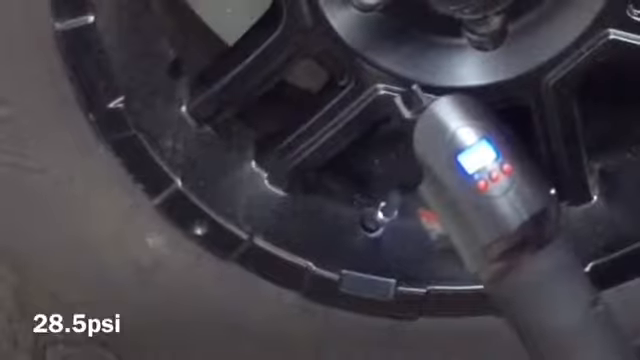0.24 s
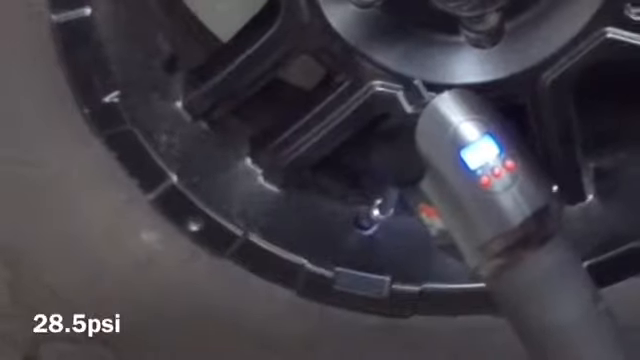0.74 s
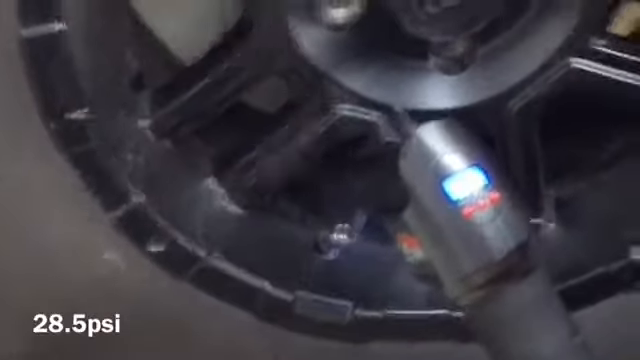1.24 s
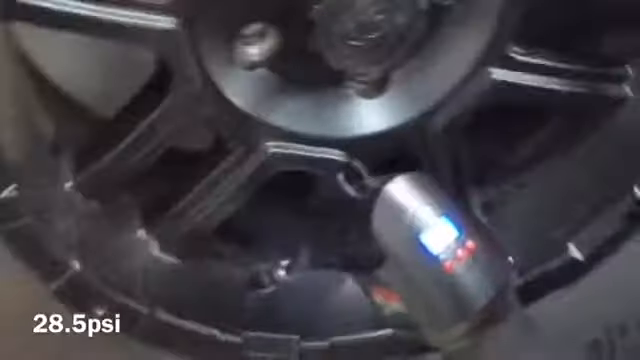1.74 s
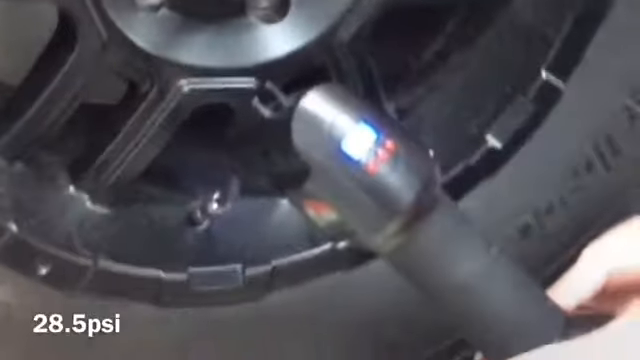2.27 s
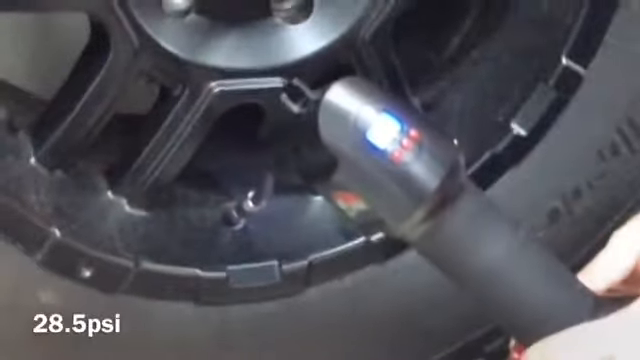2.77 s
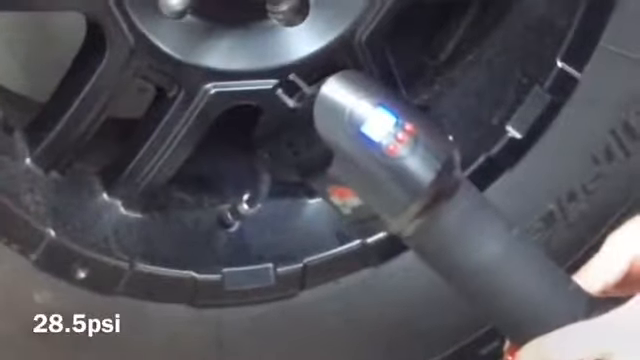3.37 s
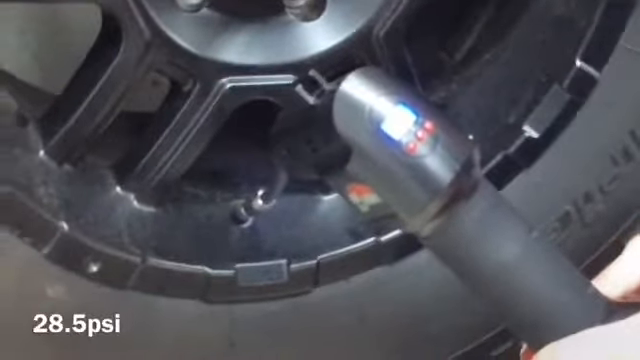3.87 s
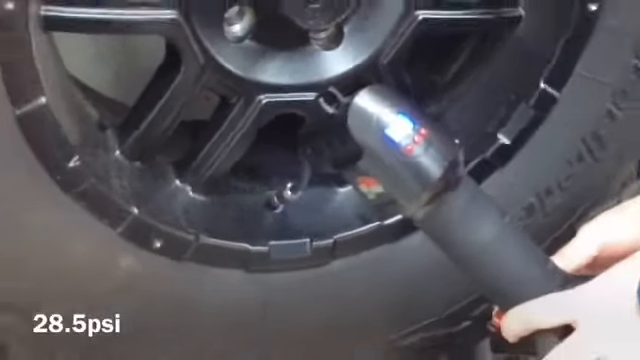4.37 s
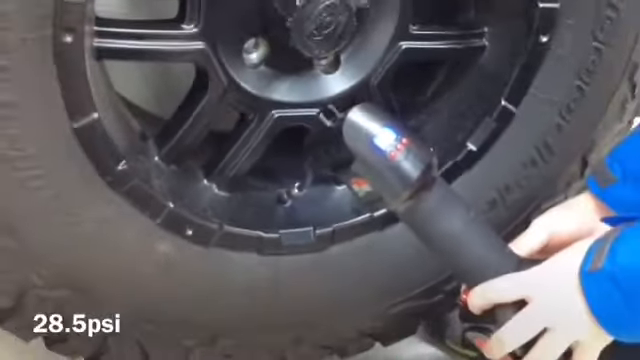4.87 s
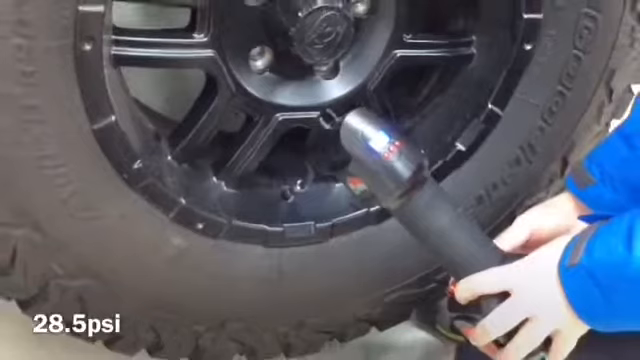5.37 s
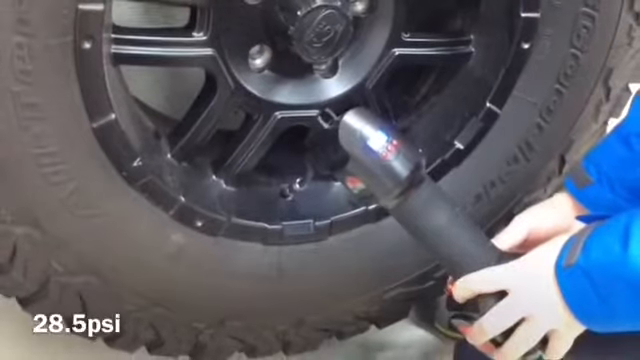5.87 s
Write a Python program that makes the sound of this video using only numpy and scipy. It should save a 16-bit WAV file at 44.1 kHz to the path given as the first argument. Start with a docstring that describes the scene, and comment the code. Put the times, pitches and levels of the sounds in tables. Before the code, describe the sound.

From 0 to about 6 seconds a small cordless compressor runs without a break, close to the microphone beside a car wheel. Roughly 41 to 42 piston strokes each second merge into a rough, steady, buzzing drone. Each stroke carries sharp valve slaps and reed flutter ringing around 1 kilohertz and 2 kilohertz, thin housing vibration, dense gear-tooth rattle and air hiss that surges and dips with the stroke. Pitch barely sags, with tiny irregular wobble. Until 1.3 seconds the sound is frontal and bright; between about 1.35 and 1.95 the microphone moves round, and the hiss and knocks change colour. Around 2.7 to 2.9 it turns further sideways and the fine high spray drops a few decibels. Afterwards the slightly duller buzz holds even to the end, dry, with only a faint quick echo off the rim.

```python
"""A small cordless compressor pumps a car tyre at a nearly even speed, heard close up in front of the wheel.
On each crank turn the intake reed flutters and the outlet valve lifts and slaps shut: clicks made to ring.
The piston shakes the housing (a sum of cosines), the gear teeth rattle (smeared ticks) and air hisses
through the pump (coloured noise). The treble dulls a little as the microphone moves round."""
import sys
import numpy as np
from scipy import signal
from scipy.fft import rfft, irfft
from scipy.io import wavfile
from scipy.ndimage import map_coordinates

SR = 44100
rng = np.random.default_rng(int(sys.argv[2]) if len(sys.argv) > 2 else 0)


def inscribe(sig):
    """Save sig as 16-bit PCM at rate SR to the path in sys.argv[1].

    A 1-D sig is mono; a 2-D sig holds one channel per row.
    Samples are clipped to [-1, 1] before scaling.
    """
    pcm = np.round(np.clip(np.atleast_2d(sig).T, -1, 1) * 32767)
    wavfile.write(sys.argv[1], SR, pcm.astype(np.int16))


N = 269892   # length in samples

# Knocks of the valves, reed and piston in one turn. Each row: crank position in turns, ring in Hz,
# ring width in Hz, relative peak in dB, gain towards the side in dB, unevenness from turn to turn in dB.
VALVE_KNOCKS = [ (0.0287, 2167, 139, -27, 2.5, .1), (0.1599, 2052, 97, -26, -2, 0.2),
                (0.43, 859, 154, -24, 1.2, 1.1), (0.424, 1355, 106, -28, -2.5, -0.7),
                (.4265, 2537, 157, -42, 11, 1.5), (0.525, 1111, 119, -23, 0.5, 0.1),
                (0.5271, 1810, 159, -39, 7.5, 2), (0.586, 3150, 400, -30.5, -10, 3.5),
                (.644, 896, 374, -13, 1, .3), (0.728, 1085, 387, -19.5, 0.5, 0),
                (0.803, 614.7, 55.5, -46.5, 9, 1.5), (.959, 2447, 132, -38.5, 10.5, .5),
                (.010, 4590, 400, -27, -9, 1.5)]
# Housing shaken by the piston. Each row: multiple of the crank speed, relative level in dB.
HOUSING_SHAKE = [(1, -40), (2, -15.5), (3, -17.5), (4, -11.5), (5, -10.5), (6, -9), (7, -4.5), (8, -5.5),
                 (9, -31), (10, -14.5), (11, 2.5), (12, -4)]
# Colour of the hiss in front of the pump. Each row: frequency in Hz, relative level in dB per Hz.
FRONT_HISS_COLOUR = [(2100, 2), (2500, 3), (2750, 0.5), (3050, 4), (3600, 0), (4150, 0), (4650, 4.5),
                     (5000, -3), (6000, 3.5), (6600, -4), (7500, -7)]
# Colour of the hiss at the side of the pump. Each row: frequency in Hz, relative level in dB per Hz.
SIDE_HISS_COLOUR = [(2100, 2), (2600, 7.5), (2950, -2), (3300, 1), (3650, -2), (3960, 7), (4250, -1.5),
                    (4520, 3.5), (5000, -1.5), (5500, 3.5), (6150, 4), (6600, -1.5), (7500, -1)]
# Colour of the fine, high spray of air. Each row: frequency in Hz, relative level in dB per Hz.
SPRAY_COLOUR = [(5500, -32), (6800, 3), (7400, -2), (8800, 4.5), (10000, 2), (11200, -1), (12800, -0.5),
                (13700, 0.5), (14800, -4), (15800, -6)]
# Colour of turbulence and rattle in the pump body and hose. Each row: frequency in Hz,
# relative level in dB per Hz.
CHURN_COLOUR = [(42, -32), (55, -20.5), (130, -30), (230, -18), (340, -12), (460, -7.5), (540, -9.5),
                (680, -4.5), (900, 0), (1020, 2), (1230, -10.5), (1350, -2.5), (1650, -9.5), (1950, -3),
                (2500, -8)]
# Moves of the microphone round the pump. Each row: start in seconds, length in seconds,
# share of the side view gained, change of the fine spray in dB.
MICROPHONE_MOVES = [(1.35, .6, 0.55, 0.4), (2.66, 0.26, .33, -3.5)]

START_VIEW = 0.088   # 0 in front of the pump, 1 at its side
PINION_TEETH, WHEEL_TEETH = 11, 41
# The crank slows a little as the tyre fills.
START_TURN, START_TURNS_PER_S, SAG_TURNS_PER_S2 = -.237, 41.602, .0361
WOBBLE_TURNS = .0017   # size of the pinion's slowest wobble
# The crank also runs a little ahead of or behind its steady pace, whole strokes at a time.
WANDER_TURNS, WANDER_HZ = .005, 5
# Levels in front of the pump, and what they gain at its side.
OUTLET_DB, OUTLET_SIDE_DB = -28.5, -2
INTAKE_DB, INTAKE_SIDE_DB = -31, 0.36
AIR_DB, AIR_SIDE_DB = -30.5, -0.72
HOUSING_DB = -39.5
CHURN_DB = -3   # compared with the outlet
SPRAY_DB = -34.5   # before the microphone moves
AIR_FOLLOWS_SPRAY = 0.36   # share of the spray's changes in dB that the lower hiss takes on
# The hiss surges while the outlet valve is open, drops when it shuts and recovers as the piston draws air.
OPEN_TURN, SHUT_TURN, VALVE_TRAVEL_TURNS = .46, 0.61, 0.14
LULL_DB, RECOVER_TURNS = -3, 0.4
CUTOFF_HZ = 15750


def from_db(db):
    """Decibels to gain."""
    return 10 ** (np.asarray(db) / 20)


def rms_one(x):
    """Scale to an average power of 1."""
    return x / np.sqrt(np.mean(x ** 2) + 1e-20)


def ramp(x, start, length):
    """Rise evenly from 0 to 1 over the given stretch."""
    return np.clip((x - start) / length, 0, 1)


def coloured(x, spectrum):
    """Give a sound a spectrum that falls away steeply beyond its ends; average power 1."""
    hz, db = np.transpose(spectrum)
    f = np.maximum(np.arange(N // 2 + 1) * SR / N, 1)
    skirts = np.minimum(f / hz[0], 1) ** 2 * np.minimum(hz[-1] / f, 1) ** 4
    colour = from_db(np.interp(np.log(f), np.log(hz), db))
    return rms_one(irfft(rfft(x) * skirts * colour, N))


def resonance(x, hz, width_hz):
    """A cavity that rings at one pitch: a two-pole band-pass with gain 1 on top."""
    r = np.exp(-np.pi * width_hz / SR)
    top = np.array([1, 0, -1]) * (1 - r * r) / 2
    bottom = [1, -2 * r * np.cos(2 * np.pi * hz / SR), r * r]
    return signal.lfilter(top, bottom, x + 1e-18)


def clicks(seconds, sizes):
    """A train of clicks at the given times."""
    at = np.round(seconds * SR).astype(int)
    inside = (at > 0) & (at < N)
    return np.bincount(at[inside], sizes[inside], N)


def drift(rate_hz):
    """Slow chance: noise sent twice through a one-pole low-pass; average power 1."""
    r = np.exp(-2 * np.pi * rate_hz / SR)
    slow = rng.standard_normal(N + SR)
    for _ in range(2):
        slow = signal.lfilter([1 - r], [1, -r], slow)
    return rms_one(slow[SR:])   # leave out the first second, while the filters settle


def pinion_wobble(crank, order=3):
    """The motor pinion runs unevenly; against the crank its pattern comes round every eleven turns."""
    motor = crank * WHEEL_TEETH / PINION_TEETH
    return sum(np.sin(2 * np.pi * k * motor) / k for k in range(1, order + 1))


def crank_turns(t):
    """Turns of the crank so far: a slightly slowing pace, the pinion's wobble and a slow wander."""
    steady = START_TURN + START_TURNS_PER_S * t - .5 * SAG_TURNS_PER_S2 * t ** 2
    return steady + WOBBLE_TURNS * pinion_wobble(steady) + WANDER_TURNS * drift(WANDER_HZ)


def time_of(crank, turns):
    """The moments when the crank passes the given positions."""
    return np.interp(turns, crank, np.arange(N) / SR, left=-1, right=-1)


def microphone(t):
    """Where the moves have taken the microphone: its share of the side view, and the spray level there."""
    side, spray_db = START_VIEW, SPRAY_DB
    for start_s, length_s, gained, change_db in MICROPHONE_MOVES:
        done = ramp(t, start_s, length_s)
        side = side + gained * done
        spray_db = spray_db + change_db * done
    return np.clip(side, 0, 1), spray_db


def valves(crank, side, play_s=.000018, beat_db=-0.57, split_hz=1600):
    """Each knock swells and dies in a cavity of the pump head; returns low outlet and high intake sounds."""
    turns = np.arange(-1, int(crank[-1]) + 2)
    outlet, intake = np.zeros(N), np.zeros(N)
    for position, hz, width_hz, peak_db, side_db, uneven_db in VALVE_KNOCKS:
        late, strong = rng.standard_normal((2, len(turns)))
        when = time_of(crank, turns + position) + play_s * late
        beat = beat_db * pinion_wobble(turns + position)
        force_db = peak_db + beat + uneven_db * np.minimum(strong, 2)
        # Wide rings die sooner: size each click so that its ring peaks at force_db before the mix is scaled.
        sizes = from_db(force_db) * np.e * SR / (2 * np.pi * width_hz)
        swell = resonance(clicks(when, sizes), hz, width_hz)
        ring = from_db(side_db * side) * resonance(swell, hz, width_hz)
        if hz < split_hz:
            outlet += ring
        else:
            intake += ring
    return rms_one(outlet), rms_one(intake)


def housing(crank, push_turn=.48, smear_radians=0.28):
    """The compression stroke shakes the housing at multiples of the crank speed, each with its own lag."""
    lags = smear_radians * rng.standard_normal(len(HOUSING_SHAKE))
    shake = np.zeros(N)
    for (multiple, db), lag in zip(HOUSING_SHAKE, lags):
        shake += from_db(db) * np.cos(2 * np.pi * round(multiple) * (crank - push_turn) - lag)
    return rms_one(shake)


def gear_teeth(crank, wear_db=4, pinion_db=0.0, uneven_db=-1.5, scatter_s=.000015):
    """Each wheel tooth ticks in its own way whenever it meets the pinion, whose teeth are equally worn."""
    teeth = np.arange(-WHEEL_TEETH, (int(crank[-1]) + 1) * WHEEL_TEETH)
    on_wheel, on_pinion = teeth % WHEEL_TEETH, teeth % PINION_TEETH
    seat = rng.random(WHEEL_TEETH)[on_wheel]
    flank = rng.choice([-1, 1], WHEEL_TEETH)[on_wheel]
    wheel_wear = wear_db * (2 * rng.random(WHEEL_TEETH) - 1)[on_wheel]
    pinion_wear = pinion_db * (2 * rng.random(PINION_TEETH) - 1)[on_pinion]
    late, strong = rng.standard_normal((2, len(teeth)))
    when = time_of(crank, (teeth + seat) / WHEEL_TEETH) + scatter_s * late
    return rms_one(clicks(when, flank * from_db(wheel_wear + pinion_wear + uneven_db * strong)))


def shell(x, count=40, spread_s=.002):
    """Many short reflections in the casing and the wheel smear each tick."""
    delays = np.sort(rng.random(count))   # as shares of the spread
    sizes = rng.standard_normal(count) * np.exp(-2 * delays)
    response = np.bincount((delays * spread_s * SR).astype(int), sizes)
    return rms_one(signal.fftconvolve(x, response)[:N])


def noise_and_rattle(crank, teeth_db):
    """Rushing air as plain noise, with the rattle of the gears mixed in."""
    return rng.standard_normal(N) + from_db(teeth_db) * shell(gear_teeth(crank))


def churn(crank, puff_turn=0.69, puff_length=0.21, puff_db=3, teeth_db=1):
    """Low turbulence and gear rattle fill the body, most of all while the charge is pushed into the hose."""
    off = (crank - puff_turn + .5) % 1 - .5   # turns from the middle of the puff
    puff = from_db(puff_db * np.exp(-.5 * (off / puff_length) ** 2))
    return coloured(noise_and_rattle(crank, teeth_db) * puff, CHURN_COLOUR)


def air_flow_db(crank, surge_db):
    """Strength of the hiss through each turn: surge, lull, recovery."""
    since_open = (crank - OPEN_TURN) % 1
    open_turns = SHUT_TURN - OPEN_TURN
    opened = ramp(since_open, 0, VALVE_TRAVEL_TURNS)
    shut = ramp(since_open, open_turns, VALVE_TRAVEL_TURNS)
    recovered = ramp(since_open, open_turns + VALVE_TRAVEL_TURNS, RECOVER_TURNS)
    return surge_db * (opened - shut) + LULL_DB * (shut - recovered)


def rush(crank, surge_db, teeth_db):
    """Air noise and gear rattle that surge with the stroke."""
    return from_db(air_flow_db(crank, surge_db)) * noise_and_rattle(crank, teeth_db)


def off_the_rim(x, side, front_s=0.0017, side_s=0.0027, echo_db=-19):
    """The wheel throws back an echo whose delay follows the microphone, combing the hiss."""
    delay = (front_s + (side_s - front_s) * side) * SR   # in samples
    echo = map_coordinates(x, [np.arange(N) - delay], order=3)
    return rms_one(x + from_db(echo_db) * echo)


def scene():
    """All parts of the pump follow one crank; their balance follows the microphone."""
    t = np.arange(N) / SR
    crank = crank_turns(t)
    side, spray_db = microphone(t)

    outlet_db = OUTLET_DB + OUTLET_SIDE_DB * side
    intake_db = INTAKE_DB + INTAKE_SIDE_DB * side
    outlet, intake = valves(crank, side)
    knocks = from_db(outlet_db) * outlet + from_db(intake_db) * intake
    body = from_db(HOUSING_DB) * housing(crank) + from_db(outlet_db + CHURN_DB) * churn(crank)

    air = rush(crank, surge_db=3.5, teeth_db=-3)
    hiss = (1 - side) * coloured(air, FRONT_HISS_COLOUR) + side * coloured(air, SIDE_HISS_COLOUR)
    air_db = AIR_DB + AIR_SIDE_DB * side + AIR_FOLLOWS_SPRAY * (spray_db - SPRAY_DB)
    spray = coloured(rush(crank, surge_db=2.3, teeth_db=-6), SPRAY_COLOUR)
    treble = from_db(air_db) * off_the_rim(hiss, side) + from_db(spray_db) * off_the_rim(spray, side)
    return (knocks + body + treble)[None]


def record(dry):
    """The top is cut steeply."""
    low_pass = signal.ellip(12, .1, 80, CUTOFF_HZ, fs=SR, output="sos")
    return signal.sosfilt(low_pass, dry)


dry = scene()
out = record(dry)
inscribe(out)
```